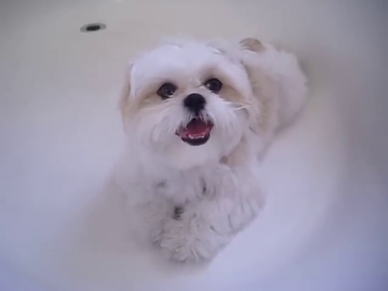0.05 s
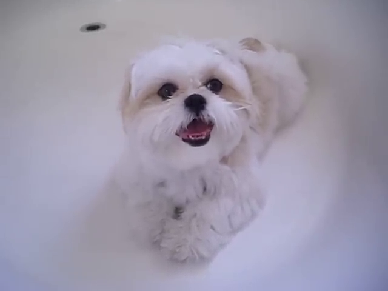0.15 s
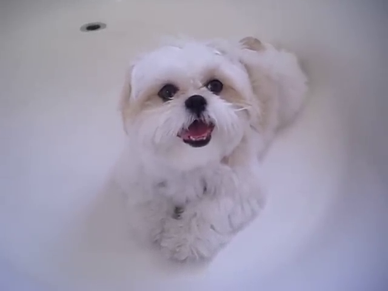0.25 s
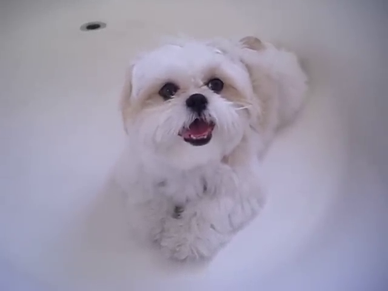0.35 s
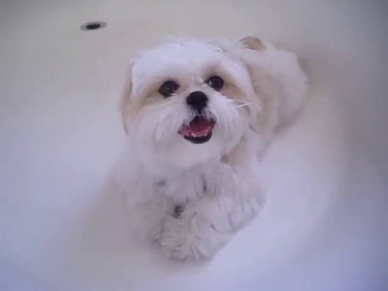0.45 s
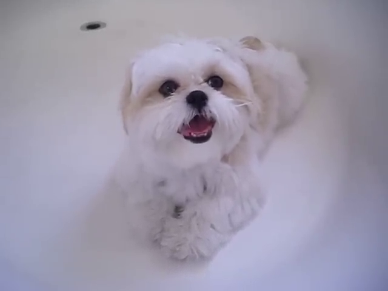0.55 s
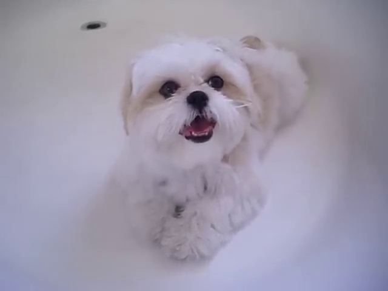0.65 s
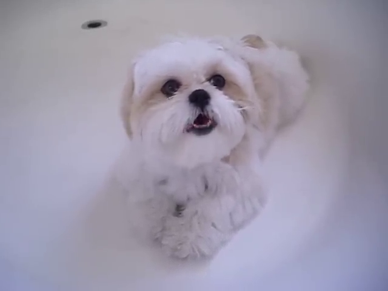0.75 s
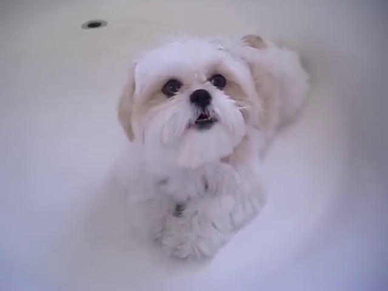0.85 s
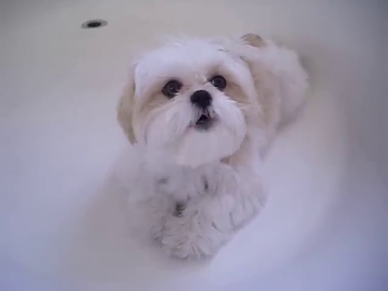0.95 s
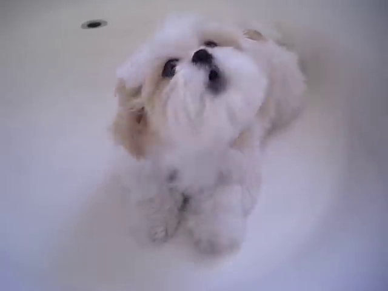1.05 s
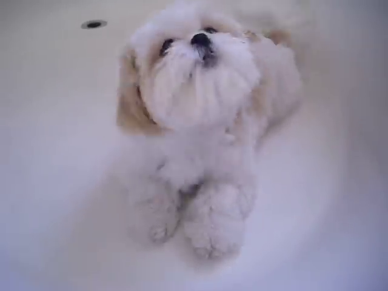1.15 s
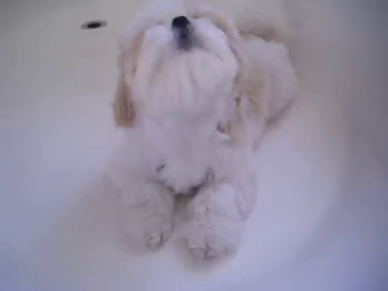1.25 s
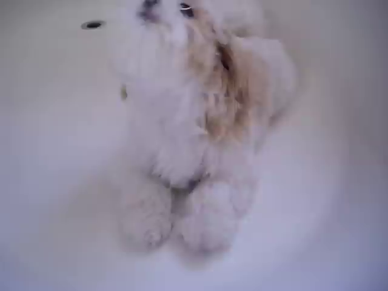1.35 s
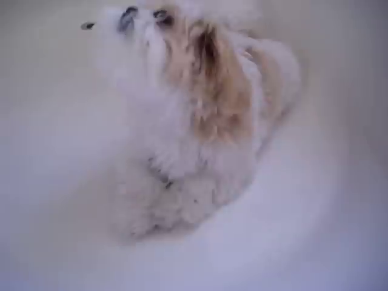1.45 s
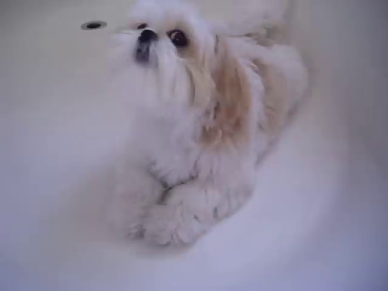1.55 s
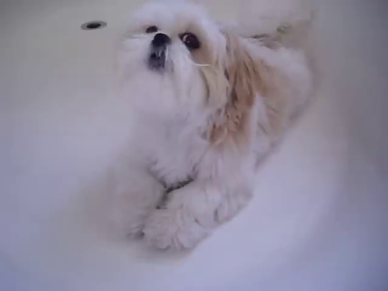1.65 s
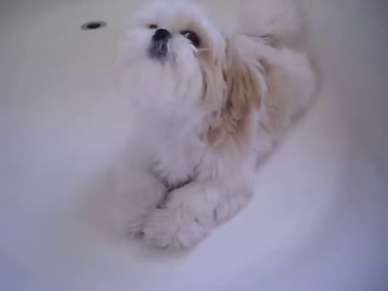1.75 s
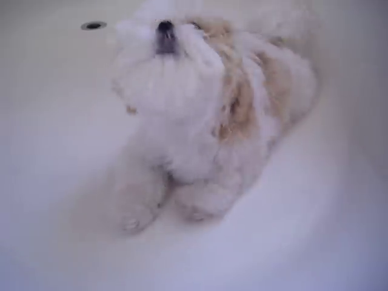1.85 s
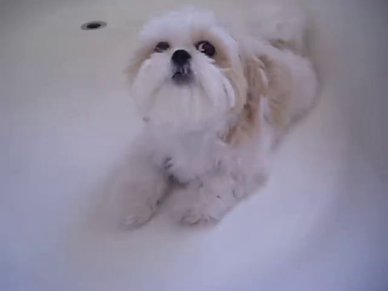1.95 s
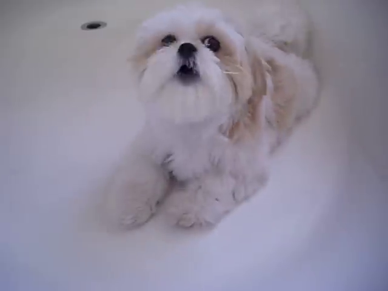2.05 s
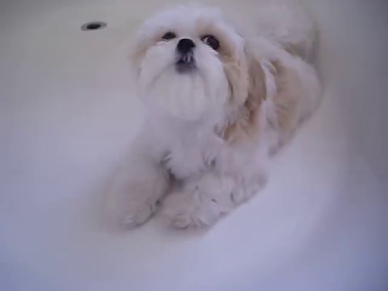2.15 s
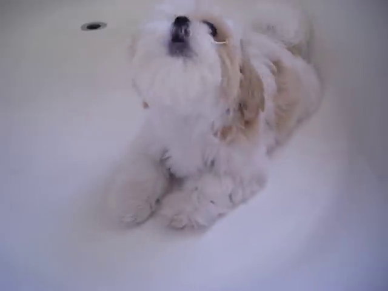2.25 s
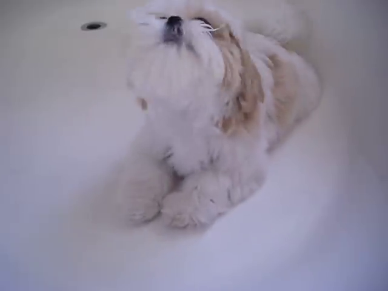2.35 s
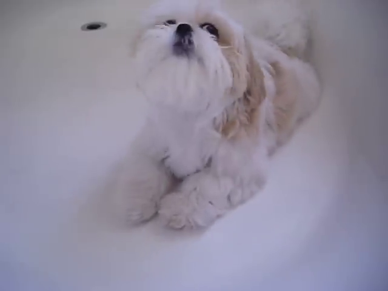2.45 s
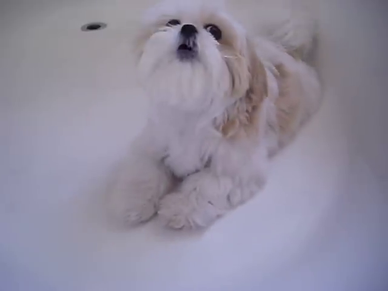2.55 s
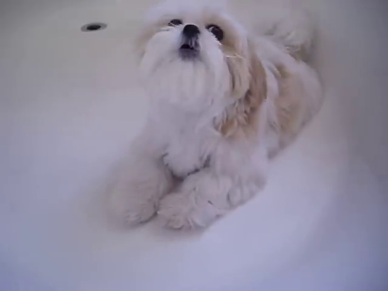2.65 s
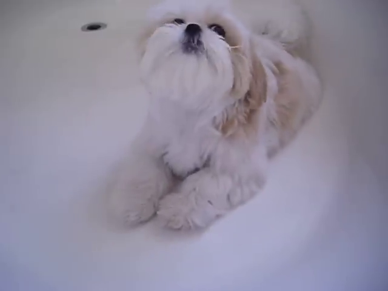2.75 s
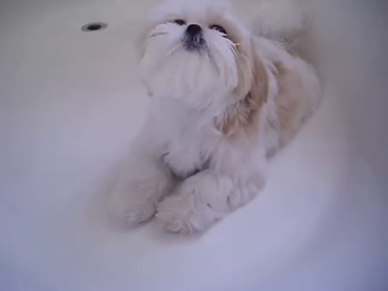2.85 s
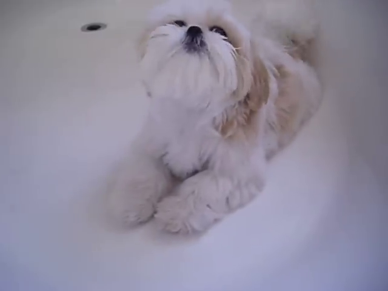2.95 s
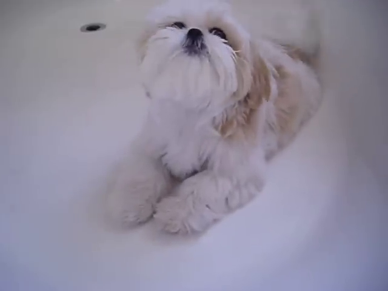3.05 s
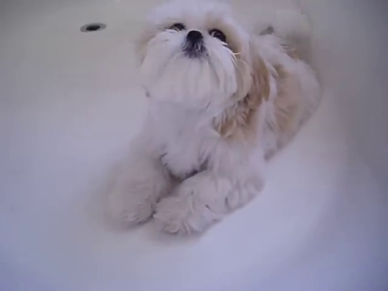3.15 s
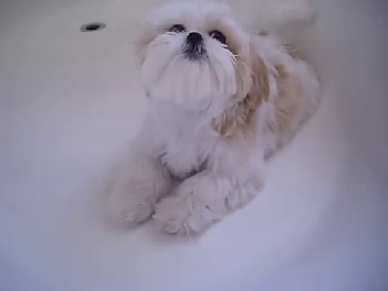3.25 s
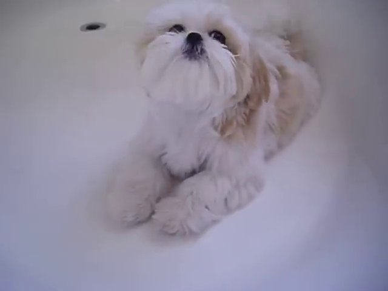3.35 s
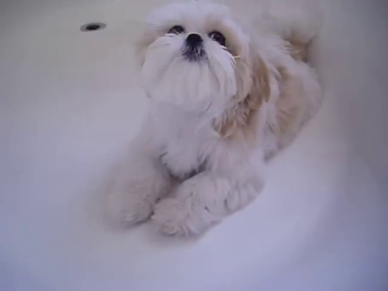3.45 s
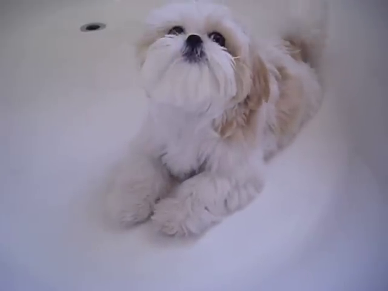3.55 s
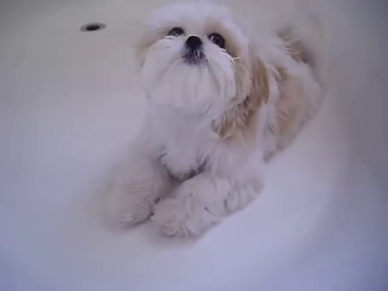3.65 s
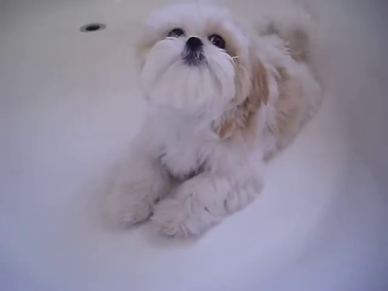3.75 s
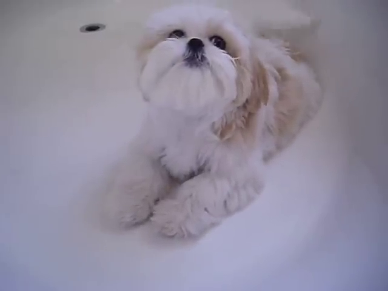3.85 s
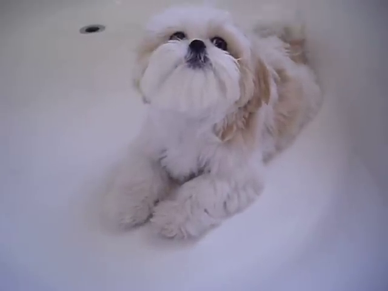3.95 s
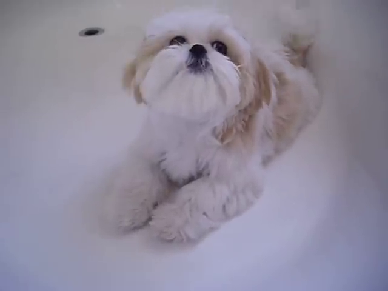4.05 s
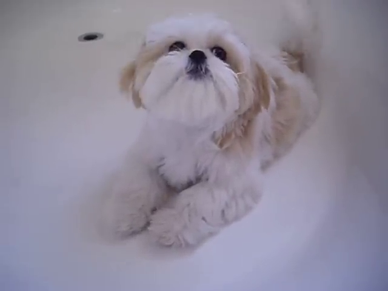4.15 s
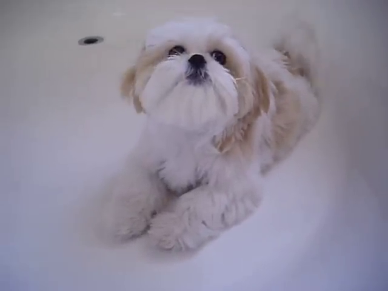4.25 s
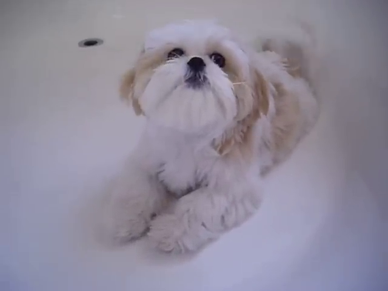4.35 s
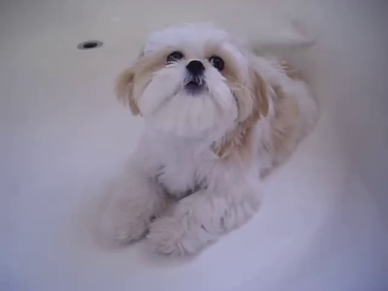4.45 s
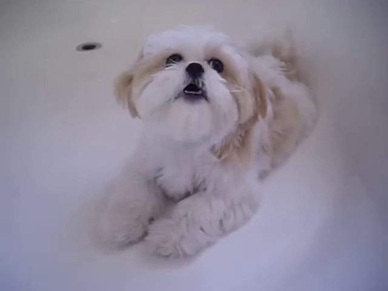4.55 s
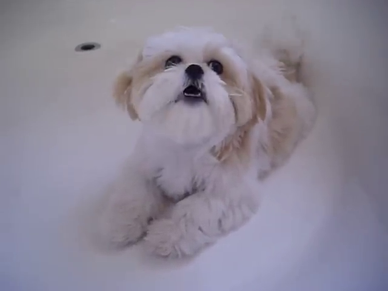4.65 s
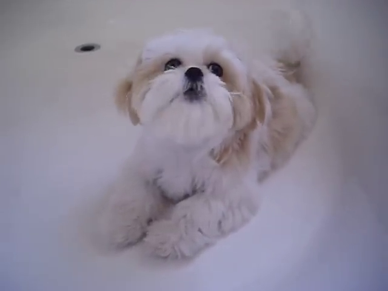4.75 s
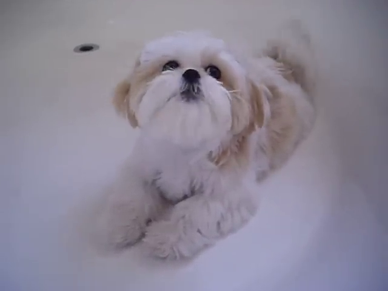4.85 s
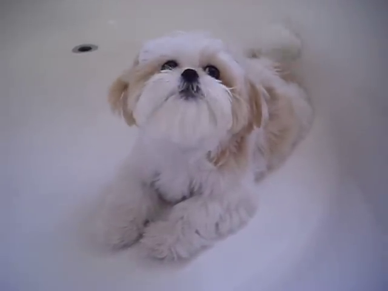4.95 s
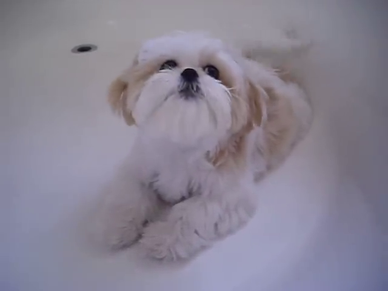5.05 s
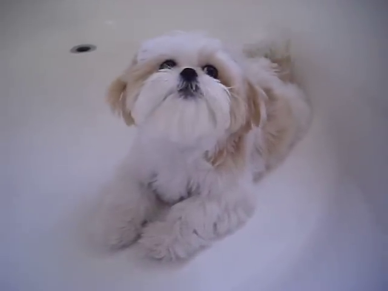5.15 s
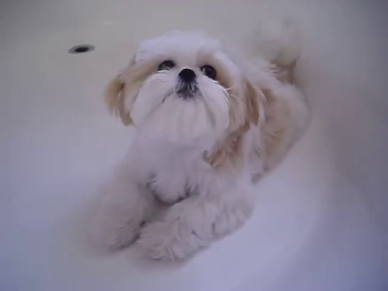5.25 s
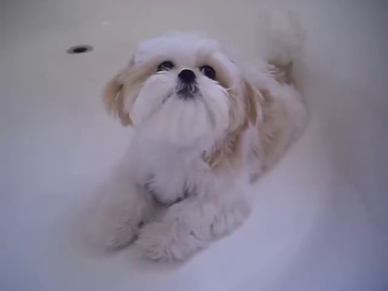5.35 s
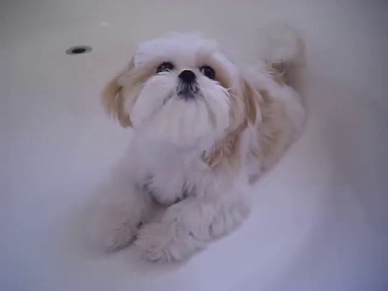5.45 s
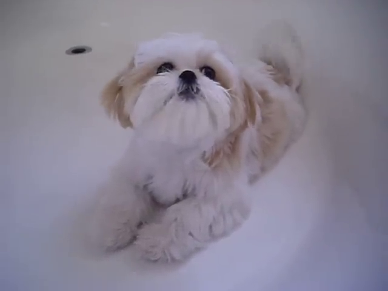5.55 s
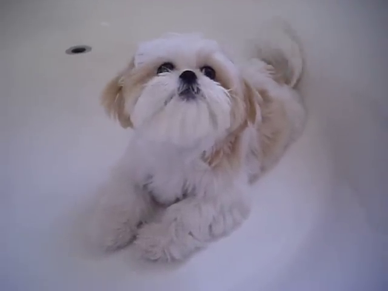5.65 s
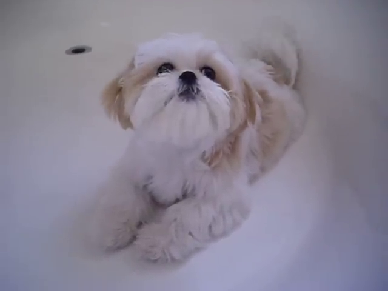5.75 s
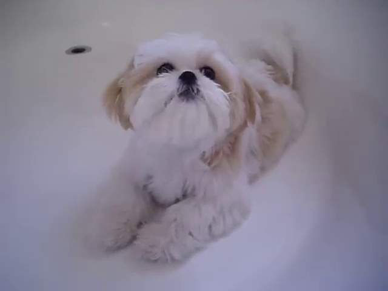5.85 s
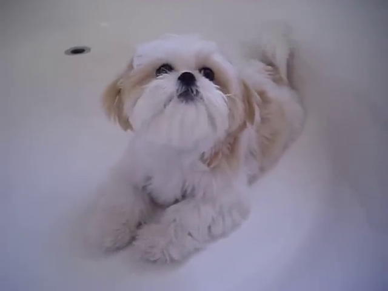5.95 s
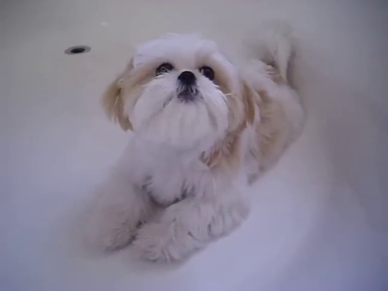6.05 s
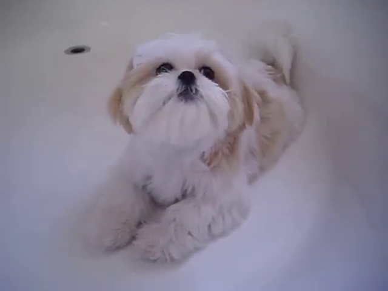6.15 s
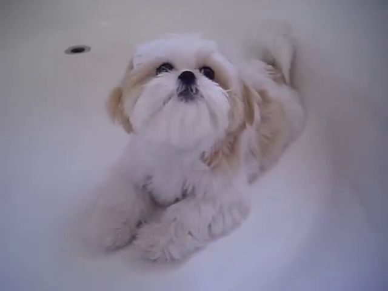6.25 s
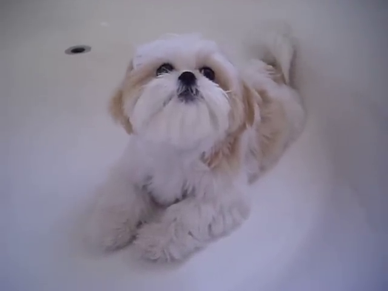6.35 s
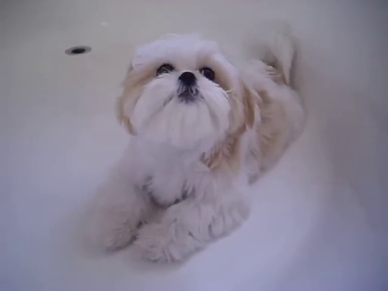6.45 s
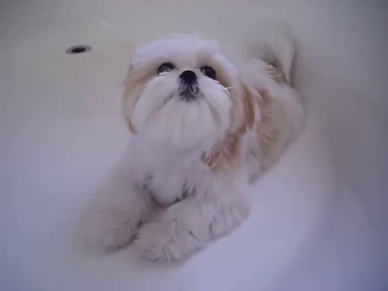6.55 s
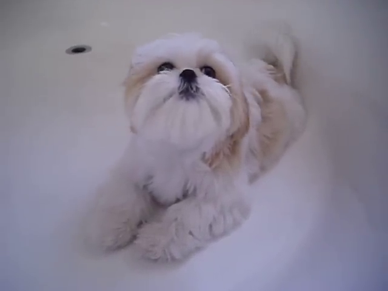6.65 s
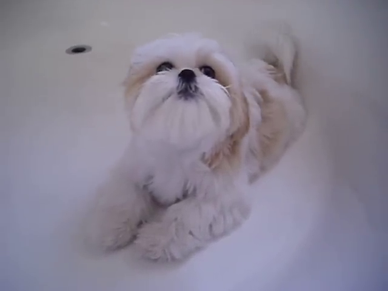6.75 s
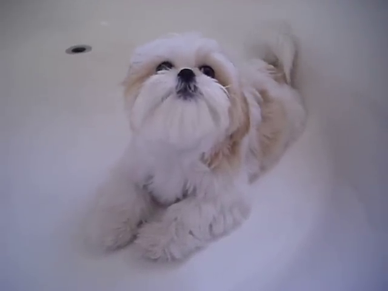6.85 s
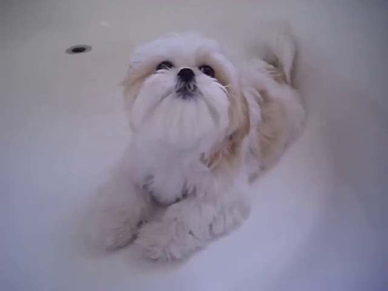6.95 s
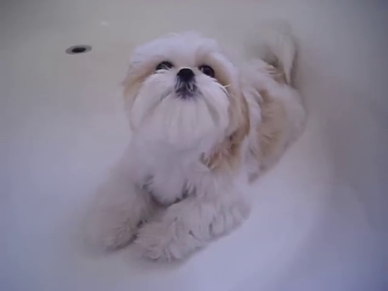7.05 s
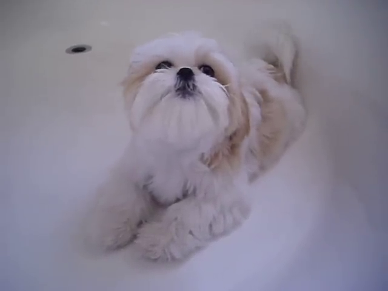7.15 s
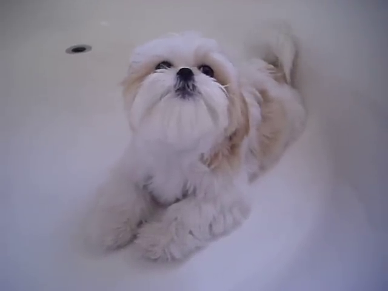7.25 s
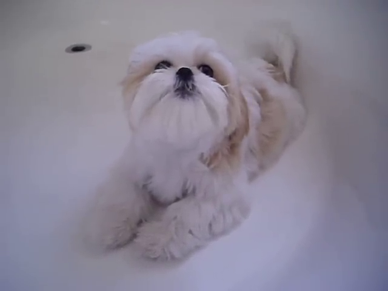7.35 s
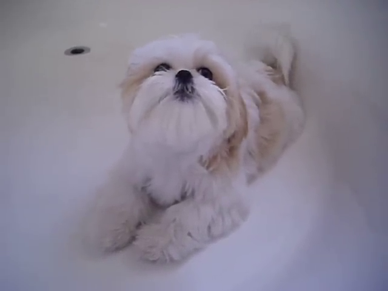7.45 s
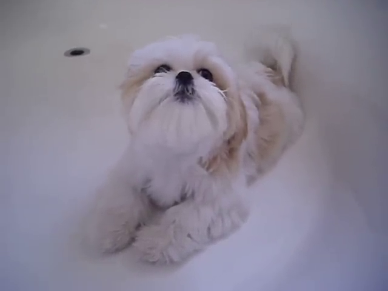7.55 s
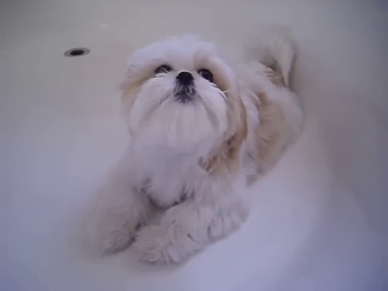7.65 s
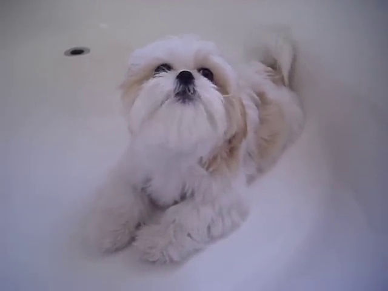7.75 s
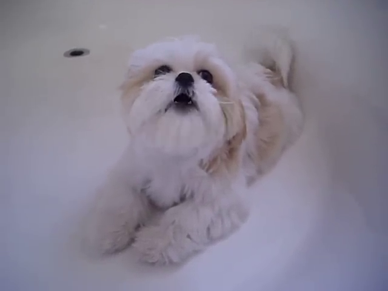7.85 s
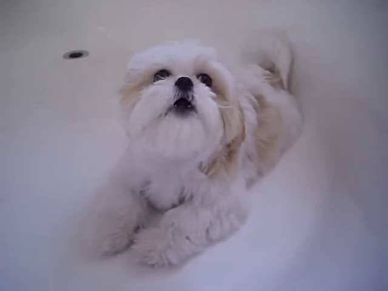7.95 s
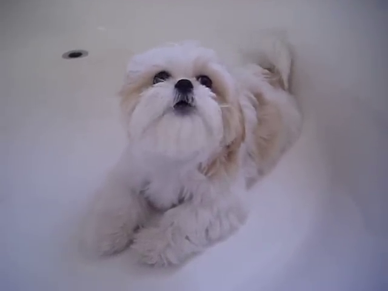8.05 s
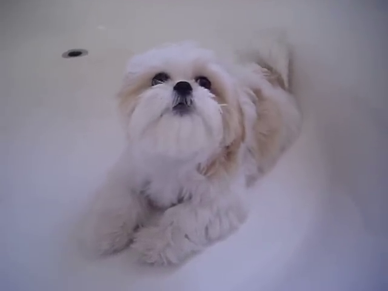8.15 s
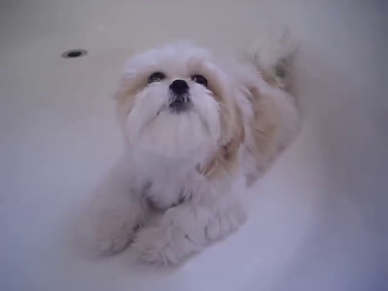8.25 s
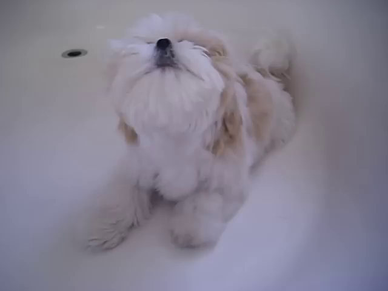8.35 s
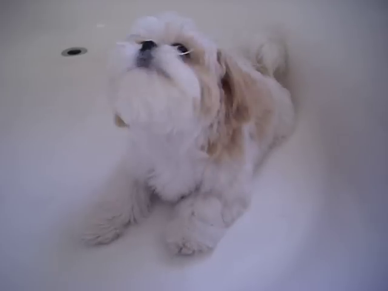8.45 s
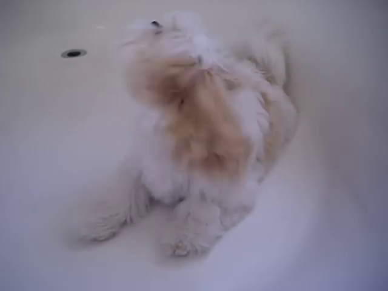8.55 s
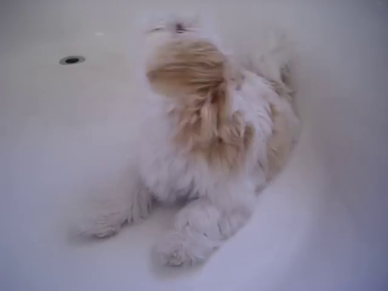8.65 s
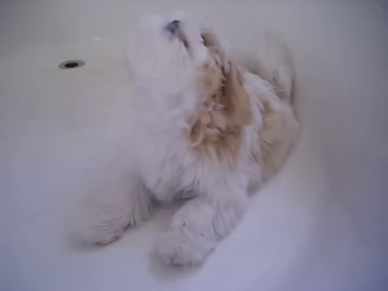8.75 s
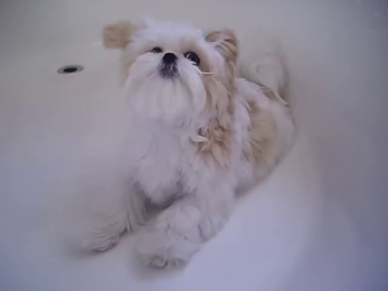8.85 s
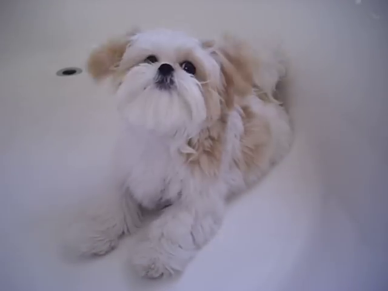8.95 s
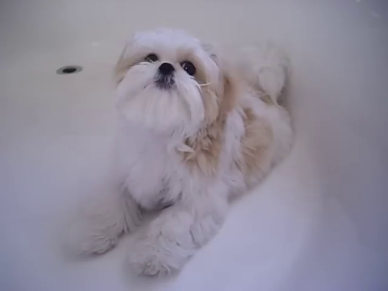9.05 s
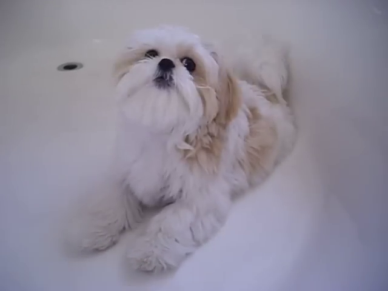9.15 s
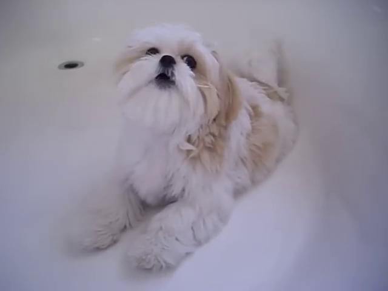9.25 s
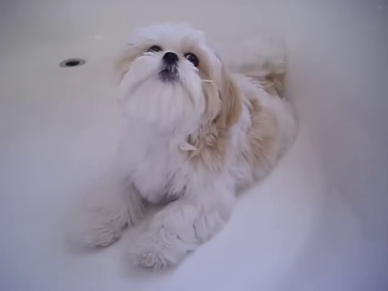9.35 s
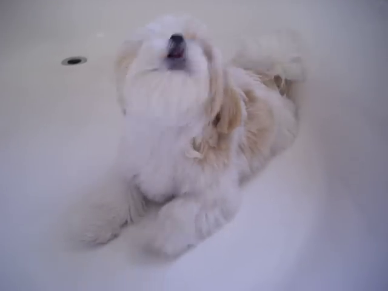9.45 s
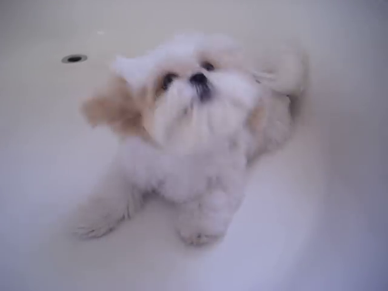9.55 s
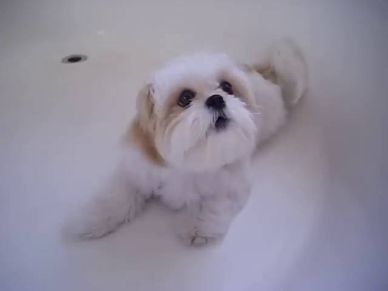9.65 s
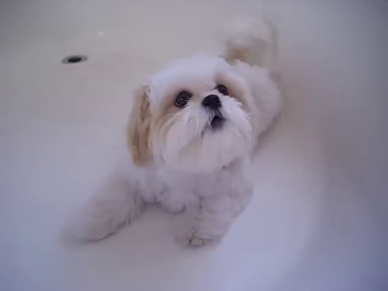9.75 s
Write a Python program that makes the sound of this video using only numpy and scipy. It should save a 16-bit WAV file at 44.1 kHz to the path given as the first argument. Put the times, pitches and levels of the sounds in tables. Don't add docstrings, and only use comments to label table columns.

```python
import sys
import numpy as np
from scipy import signal
from scipy.fft import rfft, irfft
from scipy.io import wavfile
from scipy.ndimage import uniform_filter1d

SR = 44100
rng = np.random.default_rng(int(sys.argv[2]) if len(sys.argv) > 2 else 0)


def inscribe(sig):
    pcm = np.round(np.clip(np.atleast_2d(sig).T, -1, 1) * 32767)
    wavfile.write(sys.argv[1], SR, pcm.astype(np.int16))


def invert_db(level):
    return 10 ** (np.asarray(level, dtype=float) / 20)


N = 432180


def evened(x):
    return x / np.sqrt(np.mean(x ** 2) + 1e-20)


def read(points, hz):
    f, value = np.transpose(points)
    return np.interp(np.log(hz + 1), np.log(f + 1), value)


def add(mix, s, sound):
    part = mix[round(s * SR):][:len(sound)]
    part += sound[:len(part)]


def resonate(x, hz, width):
    b, a = signal.iirpeak(hz, hz / max(width, 5), SR)
    return signal.lfilter(b, a, x)


def through(x, modes):
    out = 0
    for k, (hz, width, db) in enumerate(modes):
        ring = resonate(resonate(x, hz, width), hz, width)
        out = out + (-1) ** k * invert_db(db) * ring
    return out


# frequency in Hz, density in dB per Hz.
HISS_SPECTRUM = [(20, -4), (60, 1), (300, -1), (1200, -5), (2000, -9), (3200, -9.5), (5300, -11),
                 (6200, -6.5), (6900, -11), (7500, -24.5), (8200, -48)]


def hiss():
    level_db = -70
    colour = invert_db(read(HISS_SPECTRUM, np.fft.rfftfreq(N, 1 / SR)))
    noise = irfft(rfft(rng.standard_normal(N)) * colour, N)
    return invert_db(level_db) * evened(noise)


# frequency in Hz, time to fall by 60 dB in seconds.
ROOM_DECAY = [(200, 0.51), (600, 0.26), (1000, 0.27), (1500, 0.16), (2100, .19), (2700, 0.24), (4000, 0.15),
              (6500, 0.15)]
# frequency in Hz, level in dB.
ROOM_COLOUR = [(120, -0.5), (200, -7.5), (270, 1), (600, -3), (800, 3), (1000, 0), (1600, 6.5), (2200, 3),
               (2800, 3.5), (5000, 1)]
# delay in seconds, level in dB.
WALL_ECHOES = [(.0021, -8), (.0047, -8.5), (.0083, -6), (.0125, -4), (.019, -7)]


def bathroom(x):
    late_db, late_stretch = -14.5, 2.3
    taps = np.zeros(SR)
    at = np.arange(300, SR - 20, 20)
    taps[at + rng.integers(0, 20, len(at))] = rng.choice([-1., 1.], len(at))
    hz, t, bands = signal.stft(taps, SR, nperseg=256)
    fall_db = -60 * t / read(ROOM_DECAY, hz)[:, None]
    room_and_hall = invert_db(fall_db) + invert_db(late_db + fall_db / late_stretch)
    bands = bands * invert_db(read(ROOM_COLOUR, hz))[:, None] * room_and_hall
    tail = signal.istft(bands, SR, nperseg=256)[1]
    tail /= np.linalg.norm(tail)
    for k, (s, db) in enumerate(WALL_ECHOES):
        tail[round(s * SR)] += (-1) ** k * invert_db(db)
    return signal.fftconvolve(x, tail)[:N]


# start in seconds, level in dB, pitch in Hz, 60 dB decay in seconds.
TICK_EVENTS = [
    (0.061, -55.5, 5000, 0.014),
    (.77, -52, 5000, 0.0075),
    (7.276, -49, 2615, 0.0046),
    (7.514, -49, 2150, 0.036),
]


def ticks():
    out = np.zeros(N)
    t = np.arange(2000) / SR
    for s, db, hz, t60 in TICK_EVENTS:
        add(out, s, invert_db(db - 60 * t / t60) * np.sin(2 * np.pi * hz * t))
    return out


# start in seconds, length in seconds, level in dB, whistle in Hz,
# hiss in dB relative to the whistle.
SNIFF_EVENTS = [
    (0.902, 0.14, -59.5, 1200, -15.5),
    (3.712, 0.031, -69.5, 2770, 6),
    (3.988, 0.053, -64.5, 2720, 9.5),
    (4.075, 0.033, -76.5, 3000, 5),
    (4.757, 0.11, -62.5, 1100, -1.5),
    (4.946, 0.042, -71.5, 4540, 3),
    (8.008, .22, -69, 1180, -20.5),
    (8.87, 0.24, -75, 2830, 9),
    (9.332, 0.13, -66, 1144, -11.5),
]


def sniffs():
    out = np.zeros(N)
    for s, length, db, hz, hiss_db in SNIFF_EVENTS:
        air = rng.standard_normal(round(length * SR))
        whistle = evened(through(air, [(hz, 420, 0)]))
        rush = evened(resonate(air[::-1], 4700, 3500))
        add(out, s, invert_db(db) * (whistle + invert_db(hiss_db) * rush) * np.hanning(len(air)))
    return out


# time in seconds, pitch in Hz.
DRONE_PITCH = [(3.0, 182), (3.5, 178.5), (4.1, 184.1), (4.4, 175), (4.9, 172), (5.8, 173.8), (6.5, 182.2),
               (7.0, 191.8), (7.5, 197), (7.8, 182.6)]


def drone(s, chest_db):
    level_db, short_share = -5, .45
    t = np.arange(N) / SR
    pushes = np.zeros(N)
    pushes[np.round(s * SR).astype(int)] = invert_db(chest_db + level_db)
    short, long = (signal.oaconvolve(pushes, np.hanning(size))[:N] for size in (1700, 3600))
    when, hz = np.transpose(DRONE_PITCH)
    turns = np.cumsum(np.interp(t, when, hz)) / SR
    tone = np.sin(2 * np.pi * turns) + .4 * np.sin(4 * np.pi * turns)
    return (short_share * short + (1 - short_share) * long) * tone


# time in seconds, throbs so far (a count).
PACE_FIRST = [(2.823, 0), (3.113, 7), (3.51, 16), (3.72, 21), (3.914, 26), (4.007, 28), (4.342, 34),
              (4.376, 35), (4.48, 36)]
PACE_LONG = [(4.903, 0), (4.93, 1), (5.089, 5), (5.206, 8), (5.257, 9), (5.284, 10), (5.491, 15),
             (5.826, 22), (5.889, 24), (6.052, 27), (6.175, 30), (6.32, 33), (6.416, 36), (6.654, 42),
             (6.797, 45), (7.396, 59), (7.67, 65), (7.827, 70)]
PACE_LAST = [(8.505, 0), (8.657, 3), (8.698, 4), (8.754, 5), (8.916, 9), (9.012, 11)]
# time in seconds, effort in dB,
# mouth in dB (how hard the first beat snaps through the nose).
GROWL_FIRST = [(2.823, -58, 4), (2.864, -70, 0), (2.99, -53.5, -12), (3.113, -50.5, 2), (3.3, -52.5, 1.5),
               (3.65, -51, 0), (4.007, -52, 3), (4.06, -55.5, 4.5), (4.342, -57.5, 0.5), (4.48, -67, 4)]
GROWL_LONG = [(4.903, -43.5, 0), (4.964, -42.5, -3), (5.125, -43.5, -7), (5.206, -53.5, -4),
              (5.257, -54.5, 3), (5.284, -44, -4), (5.5, -47, 0), (5.826, -49, -1.5), (6.03, -54, 3),
              (6.1, -50, -1), (6.32, -50, 1), (6.39, -56.5, -2), (6.46, -50, -1), (6.7, -50, -0.5),
              (6.9, -51, -2.5), (7.3, -49.5, -3), (7.65, -48.5, -3), (7.828, -67, 5)]
GROWL_LAST = [(8.505, -53, -2), (8.657, -44.5, -15), (8.72, -46.5, -11), (8.8, -46, -1),
              (8.874, -53.5, 7.5), (9.012, -79, 14)]


def throbs():
    scatter_s, scatter_db = .0015, 1.1
    chest_below_db, chest_full_db = 4, -56.5
    heave_db, heave_s = 60, 0.13
    times = []
    for pace in (PACE_FIRST, PACE_LONG, PACE_LAST):
        when, number = np.transpose(pace)
        times.append(np.interp(np.arange(number[-1] + 1), number, when))
    s = np.hstack(times)
    when, effort, mouth = np.vstack([GROWL_FIRST, GROWL_LONG, GROWL_LAST]).T
    effort_db = np.interp(s, when, effort)
    mouth_db = np.interp(s, when, mouth)
    yap_s = np.transpose(YAP_EVENTS)[0]
    since_yap = s - yap_s[np.searchsorted(yap_s, s) - 1]
    chest_db = np.minimum(effort_db - chest_below_db, chest_full_db)
    chest_db = chest_db + heave_db * np.exp(-since_yap / heave_s)
    chance = rng.standard_normal((4, len(s)))
    levels_db = np.array([effort_db + mouth_db, chest_db, effort_db]) + scatter_db * chance[1:]
    return np.vstack([s + scatter_s * chance[0], levels_db])


# time in seconds, beat rate in Hz, weakening of every second beat
# from 0 to 1, length of a throb in beats, lips in dB.
GROWL_FOLDS = [(2.799, 187.3, 0.58, 2.9, -13), (4.1, 191.5, 0.33, 3.5, -11), (4.5, 172, 0.9, 1.5, -12.5),
               (4.9, 199, 0.83, 1.87, -27), (5.6, 189, 0.73, 4.36, -17), (6.4, 189.9, 0.43, 2.2, -17),
               (6.7, 220.2, 0.27, 3.9, -23), (7.8, 216, 0.34, 3.3, -21.5), (8.5, 196, 0.64, 3.4, 7),
               (8.8, 204.7, 0.62, 6.5, 4.5)]
# resonance in Hz, width in Hz, level in dB.
NOSE = [(812, 130, -3), (1062, 234, -1.5), (1430, 770, -11)]
CHEST = [(96, 93, -5.5), (170.1, 42, 3.5), (243, 75, 5.5)]
SHUT_THROAT = [(320, 18, 3), (410.2, 72, 1), (575.6, 180, -2.5)]
PARTED_LIPS = [(630, 210, 0.0054)]


def growl():
    snap_fade_db = 2
    chest_loss = 0.16
    beats = np.arange(8)
    s, snap_db, chest_db, throat_db = throbs()[:, :, None]
    when, *columns = np.transpose(GROWL_FOLDS)
    hz, limp, lasts, lips_db = (np.interp(s, when, c) for c in columns)
    late = .035 * rng.standard_normal((len(s), len(beats)))
    uneven_db = 1.5 * rng.standard_normal((len(s), len(beats)))
    stretch = 1 + late + 1.8 * late[:, :1]
    at = np.round(SR * (s + beats / hz * stretch)).astype(int)
    strength = (1 - np.clip(limp, 0, 1) * (beats % 2)) * invert_db(uneven_db)
    fade_db = -9 * (beats / lasts) ** 3
    swell_db = 6 * np.minimum(beats / lasts, 1.1)
    cavities = (
        (NOSE, snap_db + 36 - snap_fade_db * beats),
        (CHEST, chest_db + 43 - chest_loss * lips_db + 0.2 * swell_db),
        (SHUT_THROAT, throat_db + 39.5 + swell_db),
        (PARTED_LIPS, throat_db + 36 + swell_db + lips_db))
    out = drone(s[:, 0], (chest_db - 9 - .55 * lips_db)[:, 0])
    for modes, db in cavities:
        train = np.zeros(N)
        np.add.at(train, at, -strength * invert_db(db + fade_db))
        out += through(train, modes)
    shut_mouth = signal.butter(5, 1500, fs=SR, output="sos")
    return signal.sosfilt(shut_mouth, out)


def contour(s, hum_s, open_s, effort_db, top_hz, rough, limp, top_at, shut_db, release_db):
    hum_db, hum_swell_db_per_s, snap_s = -25.5, 600.5, 0.016
    crest, open_db, late_share = .4, -8, 0.25
    release_s = .035
    open_hz, climb_hz_per_s, sag_hz_per_s, bend = 411.8, 5500, 1400, .62
    abrupt_s, even_start, limp_end = .016, 0.2, .3

    share = np.array([0, crest / 2, crest, .7, 1])
    t = np.r_[-hum_s, -min(snap_s, .9 * hum_s), share * open_s, open_s + release_s]
    arch_db = effort_db + np.array(
        [open_db, open_db / 3, 0, late_share * shut_db, shut_db, shut_db + release_db])
    db = np.r_[hum_db - hum_swell_db_per_s * (hum_s - snap_s), hum_db, arch_db]

    rise = np.clip(t / (top_at * open_s), 0, 1) ** bend
    hz = open_hz + (top_hz - open_hz) * rise + climb_hz_per_s * np.minimum(t, 0)
    hz -= sag_hz_per_s * np.maximum(t - top_at * open_s, 0)

    grown = np.clip(t / (crest * open_s), 0, 1)
    uneven = limp * (even_start + (1 - even_start) * grown)
    uneven[-1] = limp_end
    start = (abrupt_s / hum_s) ** 2
    return np.transpose([s + t, db, hz, uneven, rough * (start + (1 - start) * grown)])


# resonance in Hz, width in Hz, level in dB.
OPEN_THROAT = [(314, 240, -24.5), (685.1, 140, -4.5), (954, 340, 1), (1278, 280, -7), (1623, 180, -15.5),
               (2150, 660, -30), (2690, 280, -19.5), (5000, 2800, -39.5)]


def yap(rows):
    s, *columns = np.transpose(rows)
    t = np.arange(s[0], s[-1], 1 / SR)
    effort_db, hz, limp, rough = (np.interp(t, s, c) for c in columns)
    rough = np.clip(rough, 0, 1)
    wobble = evened(uniform_filter1d(rng.standard_normal(len(t)), size=150))
    turns = np.cumsum(hz * (1 + 0.14 * rough * wobble)) / SR

    soft = np.clip(-effort_db / 14 - .6, 0, 3)
    folds = sum(np.cos(2 * np.pi * k * turns) / k ** soft for k in range(1, 12))
    folds *= 1 + limp * np.cos(np.pi * turns)
    folds *= invert_db(15 * rough * evened(uniform_filter1d(wobble[::-1], size=200)))
    puffs = (0.28 + np.exp(-(turns % 1) / 0.9)) * rng.standard_normal(len(t))
    drive = invert_db(effort_db) * ((1 - rough) * evened(folds) + 1.6 * rough * evened(puffs))

    hum = np.sin(2 * np.pi * turns) + 0.8 * np.sin(4 * np.pi * turns)
    hum *= invert_db(np.minimum(effort_db - 2.5, -33)) * signal.windows.tukey(len(t), .1)
    ring_out = (0, 900)
    return s[0], 2.124 * through(np.pad(drive, ring_out), OPEN_THROAT) + np.pad(hum, ring_out)


# jaws open in seconds, hum before in seconds, jaws stay open in seconds,
# effort in dB, top pitch in Hz.
YAP_EVENTS = [
    (1.033, 0.011, .096, 9.5, 592),
    (1.391, .017, 0.071, 6, 647.6),
    (1.833, .033, .074, 1.5, 630),
    (2.295, 0.034, .052, 0, 663.8),
    (8.343, .014, .07, 9.5, 525.4),
    (9.502, .02, 0.066, 5, 630),
]
# roughness from 0 to 1, strong-weak share from 0 to 1, pitch top as a share
# of the open time, fall in dB as the jaws shut, further fall in dB in the release.
YAP_VOICES = [(.25, 0.6, 0.98, -12, -40), (.15, .3, 0.98, -9.5, -24.5), (.25, .6, .8, -11.5, -8.5),
              (.25, .6, .7, -11, -7), (0.47, .7, .25, -21.5, -3), (.35, 0.69, 1, -5, -37.5)]


def yaps():
    tracks = np.zeros((len(YAP_EVENTS), N))
    for track, event, voice in zip(tracks, YAP_EVENTS, YAP_VOICES):
        add(track, *yap(contour(*event, *voice)))
    return tracks


def scene():
    yap_wet_db, growl_wet_db, small_wet_db = -8, -9.5, -21
    mix = hiss()
    small = sniffs() + ticks()
    mix += small + invert_db(small_wet_db) * bathroom(small)
    soft = growl()
    mix += soft + invert_db(growl_wet_db) * bathroom(soft)
    for voice in yaps():
        mix += voice + invert_db(yap_wet_db) * bathroom(voice)
    return mix[None]


def band_limit(x):
    return signal.sosfilt(signal.butter(12, 16510, fs=SR, output="sos"), x)


# frequency in Hz, level in dB.
DULLED_TOP = [(6900, 1), (7800, -9), (15800, -4), (16000, -70)]


def record(dry):
    ceiling, lopsided = .7, 1.02
    microphone = signal.butter(8, 7300, fs=SR, output="sos")
    x = signal.sosfilt(microphone, dry)
    x = np.clip(x, -ceiling * lopsided, ceiling)
    dulling_db = read(DULLED_TOP, np.fft.rfftfreq(N, 1 / SR)) - DULLED_TOP[0][1]
    x = irfft(rfft(x) * invert_db(dulling_db), N)
    return band_limit(x)


dry = scene()
out = record(dry)
inscribe(out)
```